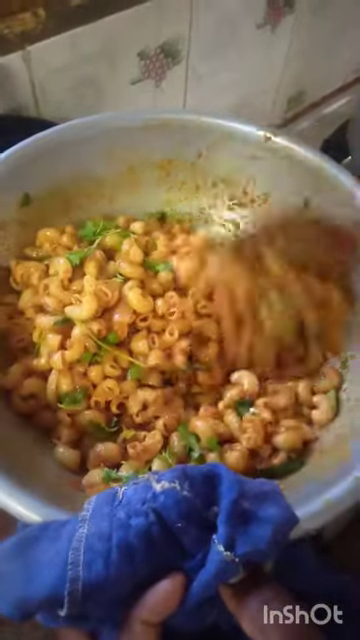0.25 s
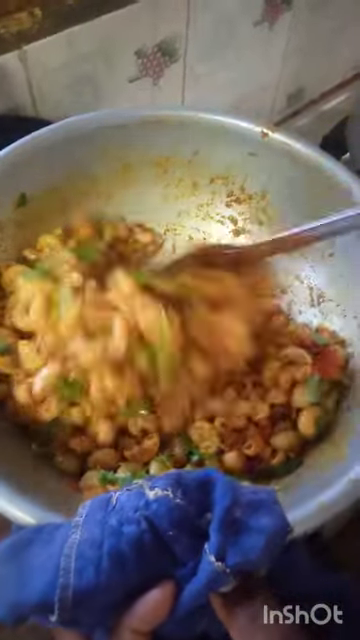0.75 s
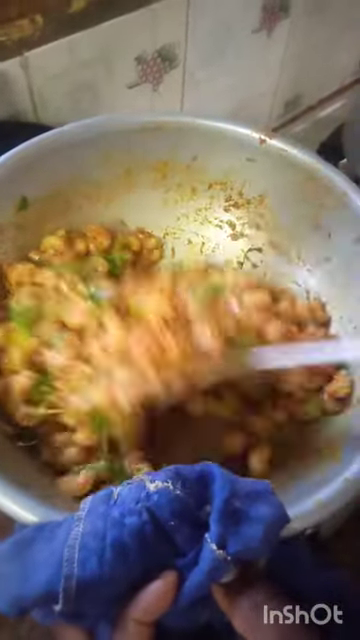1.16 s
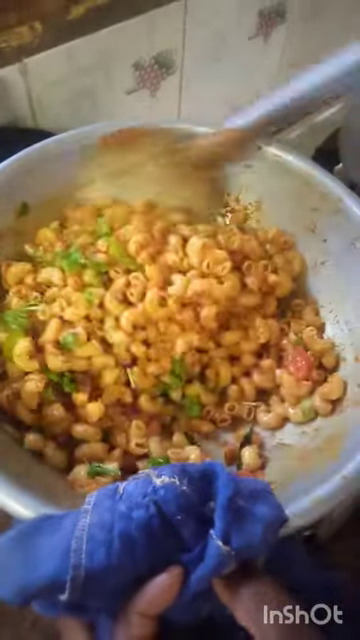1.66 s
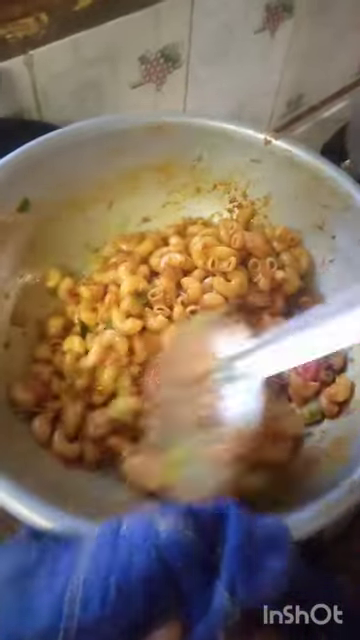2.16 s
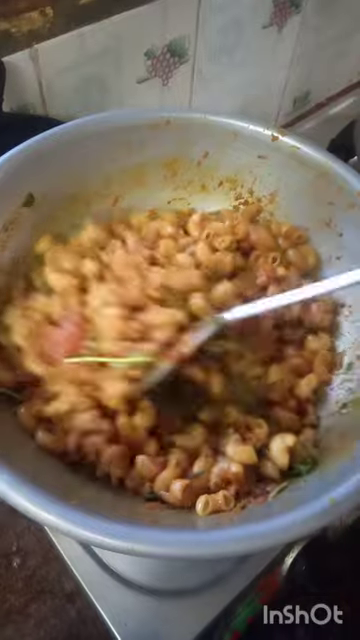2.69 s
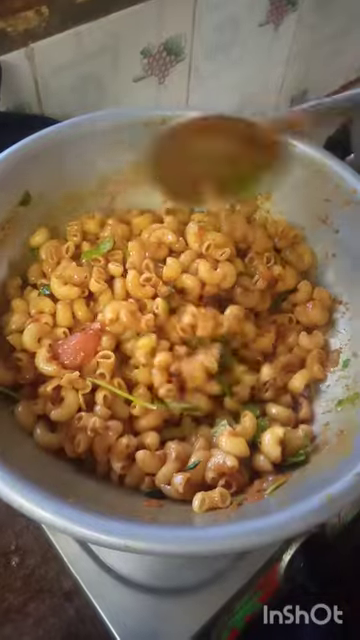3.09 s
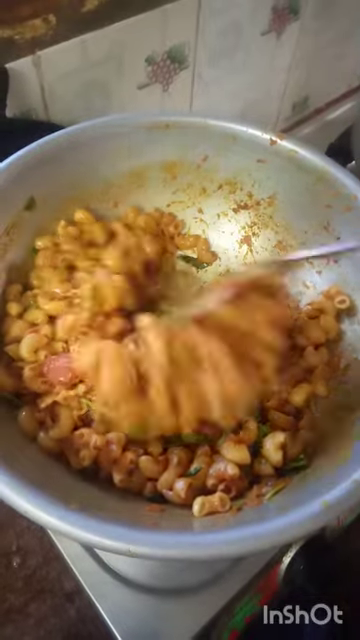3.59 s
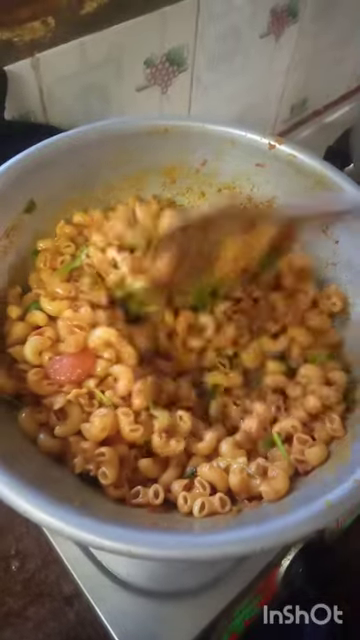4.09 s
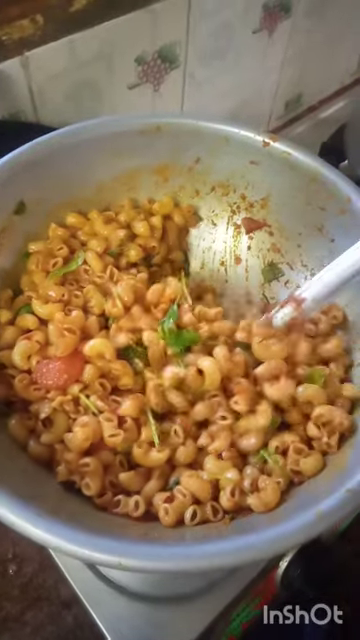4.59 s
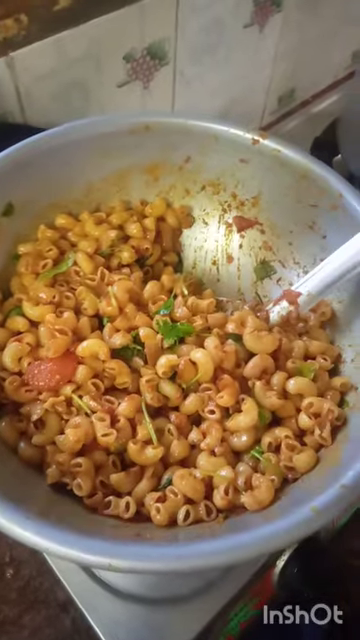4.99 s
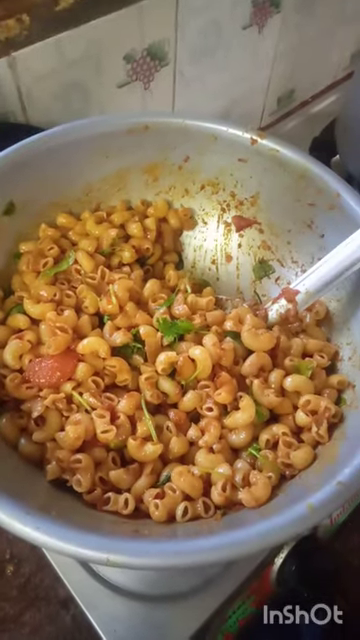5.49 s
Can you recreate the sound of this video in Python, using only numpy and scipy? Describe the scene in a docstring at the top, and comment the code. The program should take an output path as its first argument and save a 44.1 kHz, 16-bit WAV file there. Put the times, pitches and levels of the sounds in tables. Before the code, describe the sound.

A metal spoon stirs cooked pasta in a wide metal pot, close to the microphone in a small tiled kitchen. Ringing clanks alternate with raspy scrapes, soft wet plops and small squeaks. Early on the spoon judders briefly against the metal; near the end it raps the rim sharply, scrapes once more and stops. The pot sizzles faintly throughout, with a few barely audible distant chirps.

```python
"""A metal spoon clanks in a wide metal pot of cooked pasta, close to the microphone in a small tiled kitchen.
Each stroke rings the pot, scrapes along its wall and drops soft, wet lumps that squeak on the metal.
Once the spoon sticks and slips in a judder, once it is rapped on the rim; at the end the pot settles.
Underneath, the pot sizzles faintly on the stove, and something chirps far off. The sound is mono."""
import sys
import numpy as np
from scipy import signal
from scipy.io import wavfile
from scipy.ndimage import uniform_filter1d

SR = 44100
rng = np.random.default_rng(int(sys.argv[2]) if len(sys.argv) > 2 else 0)


def pcm_store(signal):
    """Save signal as 16-bit PCM."""
    levels = np.round(np.clip(np.atleast_2d(signal), -1, 1) * 32767)
    wavfile.write(sys.argv[1], SR, levels.astype(np.int16).T)


N = 253479
TIME = np.arange(N) / SR
AGE = np.arange(SR) / SR  # time since a blow [s]

SPOTS = ["floor", "bend", "wall", "rim"]  # where the spoon lands on the pot
# spoon against pot: (time [s], spot, ring [dB], ring length [factor], spoon bowl [dB], thud [dB],
# clack [dB], tick [dB])
SPOON_KNOCKS = [(.058, "floor", -18, 1.24, -3, -20, -19.5, -28),
                (0.4795, "wall", -14.5, 0.69, -19.5, -25.5, -18.5, -16),
                (1.6303, "wall", -27.5, 1.14, -26.5, -45, -34, -32.5),
                (3.1019, "bend", -21, 1.31, -11.5, -30, -21, -15),
                (4.2873, "rim", -10, 1.24, -40, -34, -21, -26.5),
                (4.629, "wall", -20.5, 0.42, -20, -36.5, -26, -32),
                (0.2173, "floor", -40, 0.17, -48, -59, -47, -29.5),
                (1.748, "wall", -41, 1.4, -57, -67, -41, -32.5),
                (1.97, "bend", -47, 2.8, -40, -53, -37, -31),
                (2.035, "wall", -34, 1.1, -31.5, -73, -33.5, -52),
                (2.062, "wall", -46, 0.41, -25.5, -65, -31.5, -43),
                (4.5057, "bend", -40, 0.59, -57, -38, -32, -42),
                (4.527, "floor", -29.5, 0.28, -35, -55, -32.5, -37.5),
                (4.587, "rim", -53, 0.56, -53, -46, -37.5, -57)]
# the pot's modes: (frequency [Hz], t60 [s], level struck on floor [dB], bend [dB], wall [dB], rim [dB])
POT_MODES = [(226.9, 0.29, -19, -5, -18, -21), (330, 0.97, -25, -23, -29, -36),
             (463.7, 0.25, -7, -9.5, -15.5, -32), (699, 0.62, -18, -10.5, -21.5, -23.5),
             (1184.4, 0.72, -11.5, -19, -22, -15), (1566, 0.74, -32, -20, -18, -19.5),
             (1735, 1, -28.5, -16, -25.5, -28.5), (1762, 0.57, -13.5, -17, -27, -28),
             (2075, 0.26, -2.5, -3, -6, -22.5), (2566, 0.49, -12, -20, -8, -12),
             (2612, 0.16, -4.5, -32, -1, -17), (2991, 0.21, 0, -2, 0.5, 1.5),
             (3300, 0.27, -15, -10, -8.5, -11), (3563, 0.11, -9, 3.5, 0, -5.5),
             (3814, 0.23, -24.5, -26, -8, -7.5), (4036, 0.26, -11.5, -33, -12, -16.5),
             (4220, 0.25, -29, -30, -17, -21.5), (4470, 0.2, -19, -39, -15, -23),
             (5270, 0.13, -24, -9.5, -12, -39), (5450, 0.23, -20, -36, -21, -30.5),
             (7550, .14, -24, -17, -29, -20), (8200, .12, -29, -2, -30, -34)]
# the spoon's bowl, damped by pasta: (frequency [Hz], t60 [s], relative level [dB])
SPOON_MODES = [(910, 0.044, 2.5), (958, 0.098, -5), (806, 0.044, -2.5)]
# spectra of the contact sounds: (frequency [Hz], relative level [dB])
THUD_SPECTRUM = [(40, -63.5), (75, -16.5), (125, -15.5), (170, -15.5), (225, 3), (275, -2), (325, -3),
                 (400, -10), (520, -11), (900, -14), (1600, -15), (4000, -58)]
CLACK_SPECTRUM = [(150, -24), (400, -8.5), (750, 0.5), (1300, -2.5), (1850, -3), (2600, -1.5), (3600, 1.5),
                  (4600, -21), (6000, -14.5), (12000, -55.5)]
TICK_SPECTRUM = [(2000, -32), (4500, -11), (5300, -7), (6100, -10.5), (7200, -1.5), (7950, -1.5),
                 (9000, -11), (11500, -20.5), (14000, -18), (16000, -13.5)]
GRIT_SPECTRUM = [(150, -8.5), (400, -3.5), (800, 1.5), (1300, -1), (2100, 0), (3200, 5.5), (3900, -0.5),
                 (4700, -9.5), (6200, -10), (10000, -44.5)]
# the spoon's edge drags on the metal: (time [s], hold [s], rasp [dB], wet hiss [dB], ring over rasp [dB])
EDGE_SCRAPES = [(0.093, .11, -39, -33, -8), (0.216, 0.021, -39.5, -35, -6), (0.524, 0.12, -30.5, -40, -8),
                (1.142, 0.15, -33, -33, -16), (1.658, 0.053, -37, -37, -0.5), (1.752, 0.38, -39, -38, -2),
                (1.97, 0.048, -42.5, -46, -2), (2.04, 0.038, -38.5, -42.5, -2), (3.13, .1, -33.5, -44, -8),
                (3.27, 0.26, -37.5, -47.5, -11.5), (4.51, 0.16, -39.5, -49, -11),
                (4.67, 0.092, -41, -46, -11)]
# the spoon glides through pasta, clear of the wall: (time [s], length [s], rasp [dB], wet hiss [dB])
SPOON_GLIDES = [(0.666, 0.35, -54, -57), (0.933, 0.67, -48, -59), (1.31, 0.5, -54, -56),
                (2.16, 0.29, -59, -60.5), (2.5, 0.51, -50.5, -55), (3.884, .42, -52, -54.5)]
# pasta pushed along the pot's floor: (time [s], hold [s], level [dB])
PASTA_TUMBLES = [(.1, 0.2, -41.5), (.54, 0.27, -43.5), (1.83, 0.13, -46), (1.98, .13, -45),
                 (2.58, 0.14, -57), (3.15, 0.11, -38.5), (3.33, .18, -43.5), (4.06, 0.091, -43),
                 (4.52, 0.26, -42)]
# lumps of pasta landing: (time [s], thud [dB], wet smack [dB])
PASTA_PLOPS = [(0.73, -36, -38.5), (1.0, -37, -46), (1.066, -47, -44), (2.2074, -34.5, -47),
               (2.229, -35.5, -46), (2.511, -55, -43), (3.352, -32, -52), (3.428, -32.5, -31.5),
               (3.484, -30, -44), (3.507, -38.5, -50), (4.027, -30.5, -38.5), (4.054, -40, -40.5),
               (4.104, -49, -44), (4.138, -46, -43), (4.547, -32.5, -44.5), (4.676, -30, -38)]
# low pot modes that the judder keeps going: (frequency [Hz], t60 [s], relative level [dB])
JUDDER_MODES = [(464, .35, -10), (322, .6, 0), (556, .35, -13)]
# the hollow body of the loaded pot: (frequency [Hz], relative level [dB])
HOLLOW_SPECTRUM = [(120, -49), (240, 2.5), (330, 0.5), (650, 3.5), (950, -13), (1250, -37), (2500, -43)]
# wet pasta on metal: (time [s], length [s], level [dB], start pitch [Hz], end pitch [Hz])
PASTA_SQUEAKS = [(0.599, 0.082, -36, 2550, 1960), (0.687, 0.043, -47, 2230, 2130),
                 (1.434, 0.11, -57, 1730, 1770), (3.276, 0.012, -51, 3300, 3200),
                 (3.378, 0.028, -39, 1900, 1900), (3.467, 0.015, -44, 1830, 1830),
                 (3.931, 0.06, -55.5, 1810, 1850)]
# the pot knocking on its support: (frequency [Hz], t60 [s], level [dB])
SETTLE_MODES = [(205, 0.085, -51), (420, .08, -52), (746, 0.13, -42.5), (853, 0.092, -45.5),
                (1020, 0.067, -47), (1236, 0.075, -48)]
# frying over the burner's rush: (frequency [Hz], relative level [dB])
SIZZLE_SPECTRUM = [(25, -31), (65, -15.5), (140, 0), (200, -10.5), (500, -16), (1100, -13), (2500, -7),
                   (3600, -10.5), (4700, -23), (6200, -22), (7700, -14), (10000, -28.5), (12000, -29.5),
                   (15500, -24.5)]
# chirps in the distance: (time [s], level [dB])
FAR_CHIRPS = [(-.05, -62), (1.02, -58), (2.322, -54), (3.44, -58)]
# reverberation of the tiled kitchen: (frequency [Hz], t60 [s])
KITCHEN_DECAY = [(150, 0.72), (400, 0.53), (1000, 0.39), (3000, 0.43), (8000, 0.37), (15000, 0.14)]


def knocks():
    """Right at the microphone, each knock rings the pot over the short clack of the spoon."""
    out = np.zeros(N)
    bowl = ringing(SPOON_MODES) * (1 - fade(0.0087)) / 2
    for s, spot, ring_db, length, bowl_db, thud_db, clack_db, tick_db in SPOON_KNOCKS:
        add(out, s, amp(ring_db) * pot_ring(spot, length))
        add(out, s, amp(bowl_db) * bowl)
        add(out, s, amp(thud_db) * burst(THUD_SPECTRUM, t60=0.27, tail_db=-28, tail_t60=0.27, rise=0.013))
        add(out, s, amp(clack_db) * burst(CLACK_SPECTRUM, t60=0.057, tail_db=-16, tail_t60=0.81,
                                          rise=0.0047))
        add(out, s, amp(tick_db) * burst(TICK_SPECTRUM, t60=0.01, tail_db=-9, tail_t60=0.41, rise=0.00074))
    return out


def pot_ring(spot, length, split=0.0015, twin_db=-4):
    """The pot struck at one spot: it is not quite round, so each mode is a close pair that beats."""
    ring = np.zeros(SR)
    for hz, t60, *spot_db in POT_MODES:
        phase, start = 2 * np.pi * hz * AGE, rng.uniform(0, 2 * np.pi)
        lower = np.sin(phase * (1 - split / 2) + start)
        upper = amp(twin_db) * np.sin(phase * (1 + split / 2) + start)
        ring += amp(spot_db[SPOTS.index(spot)]) * fade(t60 * length) * (lower + upper)
    return ring * (1 - fade(0.0081)) / (1 + amp(twin_db))


def scraping(grit_db=-5, squelch_db=-11, hiss_db=-5, crackle_db=-6, glide_ring_db=-15):
    """Tiny slips of the spoon's edge rasp and ring the pot; wet sauce squelches and crackles."""
    moves = [(push(s, held), *levels) for s, held, *levels in EDGE_SCRAPES]
    moves += [(glide(s, length), *levels, glide_ring_db) for s, length, *levels in SPOON_GLIDES]
    force = sum(shape * amp(rasp_db) for shape, rasp_db, _, _ in moves)
    wetness = sum(shape * amp(wet_db) for shape, _, wet_db, _ in moves)
    wall_force = sum(shape * amp(rasp_db + ring_db) for shape, rasp_db, _, ring_db in moves)
    slips = grains(per_s=2000, spread_db=3)
    squelch = pops(878, 4314, t60=0.031, spread_db=7, per_pitch=250)
    crackle = pops(4500, 15030, t60=0.021, spread_db=3, per_pitch=500)
    wall_modes = [(hz, t60, wall_db) for hz, t60, _, _, wall_db, _ in POT_MODES]
    ring = excite(slips * wall_force, wall_modes)
    rasp = colour(force * (amp(grit_db) * slips + amp(squelch_db) * squelch), GRIT_SPECTRUM)
    hiss = colour(wetness * (amp(hiss_db) * slips + amp(crackle_db) * crackle), TICK_SPECTRUM)
    return ring + rasp + hiss


def push(s, held, grip_s=0.0075, ease_db_per_s=57.5, release_t60=0.15):
    """Force of one push: it grips quickly, eases while held and dies away when let go."""
    t = np.maximum(TIME - s, 0)
    grip = np.minimum(t / grip_s, 1)
    return grip * amp(-ease_db_per_s * t) * fade(release_t60, np.maximum(t - held, 0))


def glide(s, length, peak_share=0.17):
    """Speed of one glide: a soft arch that peaks early."""
    return np.sin(np.interp(TIME, [s, s + length * peak_share, s + length], [0, np.pi / 2, np.pi]))


def pops(low_hz, high_hz, t60, spread_db, per_pitch, pitches=40):
    """Tiny wet films break, each with a brief pitch of its own."""
    out, decay = np.zeros(N), fade(t60, 1 / SR)
    for hz in np.linspace(low_hz, high_hz, pitches) * rng.uniform(0.97, 1.03, pitches):
        strength = amp(spread_db * np.minimum(rng.exponential(1, per_pitch), 3))
        clicks = np.bincount(rng.integers(0, N, per_pitch), strength, N)
        resonator = [1, -2 * decay * np.cos(2 * np.pi * hz / SR), decay ** 2]
        out += signal.lfilter([1, 0, -1], resonator, clicks)
    return unit(out)


def pasta():
    """Soft pieces tumble on the pot's floor; larger lumps land with a thud and a smack."""
    shifting = sum(amp(db) * push(s, held) for s, held, db in PASTA_TUMBLES)
    out = colour(grains(per_s=560, spread_db=0) * shifting, THUD_SPECTRUM)
    for s, thud_db, smack_db in PASTA_PLOPS:
        thud = burst(THUD_SPECTRUM, t60=0.087, tail_db=-22, tail_t60=0.83, rise=0.036)
        smack = burst(GRIT_SPECTRUM, t60=0.037, tail_db=-21.5, tail_t60=0.23, rise=0.0075)
        add(out, s, amp(thud_db) * thud + amp(smack_db) * smack)
    return out


def judder(s=1.139, length=0.175, slips_per_s=160, start_hz=890, end_hz=464, sink_s=0.042, crest_s=0.078):
    """Uneven stick and slip kicks the hollow pot and a note that sinks as the pressure eases."""
    t = np.arange(0, length, 1 / SR)
    slip_rate = slips_per_s * np.exp(0.3 * wander(len(t), smooth=120))
    slips = np.diff(np.floor(np.cumsum(slip_rate) / SR), prepend=-1)
    drive = unit(slips - slips.mean()) + 0.54 * rng.standard_normal(len(t))  # kicks and rubbing
    hz = end_hz + (start_hz - end_hz) * np.exp(-(t / sink_s) ** 2)
    note = resonate(resonate(drive, hz, width_hz=65), hz, width_hz=500)
    note /= np.sqrt(uniform_filter1d(note ** 2, size=400) + 1e-12)  # friction holds the swing steady
    note *= amp(-25 - np.maximum(94 * (crest_s - t), 115 * (t - crest_s)))  # swell, then fade [dB/s]
    hollow = amp(-36 - 27 * t) * unit(colour(drive, HOLLOW_SPECTRUM))
    lift_off = np.minimum((length - t) / 0.0075, 1)
    out = np.zeros(N)
    add(out, s, lift_off * (note + hollow))
    return out + amp(-29) * excite(out, JUDDER_MODES)


def squeaks(width_hz=380):
    """Short fuzzy squeals of wet pasta rubbed along the wall."""
    out = np.zeros(N)
    for s, length, db, start_hz, end_hz in PASTA_SQUEAKS:
        hz = np.linspace(start_hz, end_hz, round(length * SR))
        rub = resonate(resonate(rng.standard_normal(len(hz)), hz, width_hz), hz, width_hz)
        add(out, s, amp(db) * unit(rub * signal.windows.tukey(len(hz), 0.5)))
    return out


def settling(s=5.572):
    """The pot settles on its support with one soft, dull knock."""
    out = np.zeros(N)
    add(out, s, ringing(SETTLE_MODES) * (1 - fade(0.011)))
    return out


def sizzle(level_db=-54.5):
    """A steady bed from the stove: fine frying in the hot pot over the burner's low rush."""
    return amp(level_db) * unit(colour(grains(per_s=14000, spread_db=2.5), SIZZLE_SPECTRUM))


def chirps(start_hz=3550, end_hz=5300, length=0.08, waver=0.012):
    """Thin, wavering upward whistles far from the microphone, perhaps a bird outside."""
    out = np.zeros(N)
    sweep = np.linspace(start_hz, end_hz, round(length * SR))
    envelope = signal.windows.tukey(len(sweep), 0.5) * fade(0.35)[:len(sweep)]
    for s, db in FAR_CHIRPS:
        hz = sweep * (1 + waver * wander(len(sweep), smooth=100))
        add(out, s, amp(db) * envelope * np.sin(2 * np.pi * np.cumsum(hz) / SR))
    return out


def kitchen(x, echoes_per_s=3000, first_echo_s=0.004):
    """Sparse reflections from close tiled walls, each band dying at its own speed."""
    echoes = rng.standard_normal(SR) * (rng.random(SR) < echoes_per_s / SR) * (AGE > first_echo_s)
    hz, t, bands = signal.stft(echoes, SR, nperseg=256)
    tail = signal.istft(bands * fade(read(KITCHEN_DECAY, hz)[:, None], t), SR)[1]
    return signal.fftconvolve(x, tail / np.linalg.norm(tail))[:N]


def burst(spectrum, t60, tail_db, tail_t60, rise):
    """A blow into many crowded modes: a quick rise, a fast drop, then a weaker tail."""
    envelope = (1 - fade(rise)) * (fade(t60) + amp(tail_db) * fade(tail_t60))
    return colour(rng.standard_normal(SR) * envelope, spectrum)


def grains(per_s, spread_db):
    """Random tiny clicks; spread_db makes their sizes unequal."""
    size = amp(spread_db * np.minimum(rng.exponential(1, N), 4))
    return unit(size * rng.choice([-1, 1], N) * (rng.random(N) < per_s / SR))


def wander(count, smooth):
    """Random drift at rms 1, averaged over smooth samples."""
    return unit(uniform_filter1d(rng.standard_normal(count), size=smooth))


def ringing(modes):
    """Impulse response of modes (frequency [Hz], t60 [s], level [dB])."""
    return sum(amp(db) * fade(t60) * np.sin(2 * np.pi * hz * AGE) for hz, t60, db in modes)


def excite(x, modes):
    """Drives modes with x, at unit energy gain."""
    ring = ringing(modes)
    return signal.oaconvolve(x, ring / np.linalg.norm(ring))[:len(x)]


def resonate(x, hz, width_hz):
    """A resonance whose centre follows the curve hz."""
    carrier = np.exp(2j * np.pi * np.cumsum(hz) / SR)
    decay = np.exp(-np.pi * width_hz / SR)
    return (carrier * signal.lfilter([1 - decay], [1, -decay], x / carrier)).real


def colour(x, spectrum, size=2048):
    """Causal filter of unit energy with the given spectrum."""
    log_gain = np.log(amp(read(spectrum, abs(np.fft.fftfreq(size, 1 / SR)))))
    taps = np.fft.ifft(np.exp(np.conj(signal.hilbert(log_gain)))).real  # minimum phase
    return signal.oaconvolve(x, taps / np.linalg.norm(taps))[:len(x)]


def read(points, hz):
    """Reads a table on a log-frequency axis."""
    table_hz, value = np.transpose(points)
    return np.interp(np.log(hz + 1), np.log(table_hz + 1), value)


def add(mix, s, sound):
    """Mixes a sound in at time s."""
    start = round(s * SR)
    sound = sound[max(-start, 0):]
    part = mix[max(start, 0):][:len(sound)]
    part += sound[:len(part)]


def fade(t60, t=AGE):
    """Decay of 60 dB in t60 seconds."""
    return np.exp(-np.log(1000) * t / t60)


def amp(db):
    """Decibels to gain."""
    return 10 ** (np.asarray(db) / 20)


def unit(x):
    """Scales to rms 1."""
    return x / np.sqrt(np.mean(x ** 2) + 1e-20)


def scene(room_db=-9, knock_room_db=-16, bass_hz=80):
    """The pot up close and the kitchen's reflections behind it, the same in both channels."""
    clanks = knocks()
    softer = scraping() + pasta() + judder() + squeaks() + settling() + chirps()
    room = kitchen(amp(knock_room_db) * clanks + amp(room_db) * softer)
    low_cut = signal.butter(2, bass_hz, "high", fs=SR, output="sos")  # the deepest bass is thinned out
    mono = signal.sosfilt(low_cut, clanks + softer + room) + sizzle()
    return np.array([mono, mono])


def record(dry, ceiling=0.91, edge_hz=15750):
    """The recorder rounds off the loudest peaks, then cuts the highest treble."""
    rounded = ceiling * np.tanh(dry / ceiling)
    lowpass = signal.firwin(511, edge_hz, window=("kaiser", 9), fs=SR)
    return signal.oaconvolve(rounded, lowpass[None], "same")


dry = scene()
out = record(dry)
pcm_store(out)
```